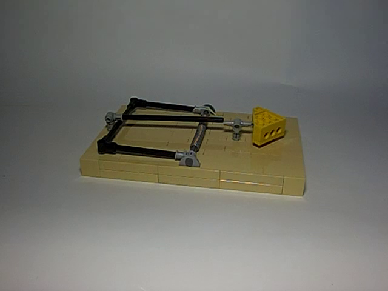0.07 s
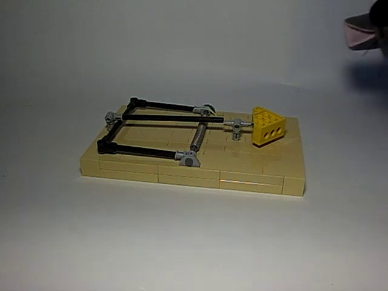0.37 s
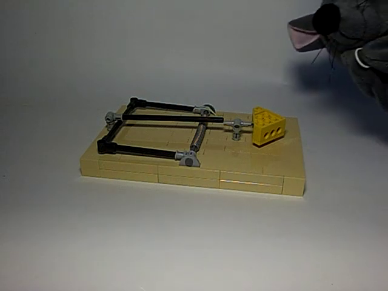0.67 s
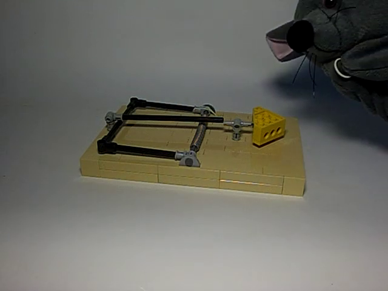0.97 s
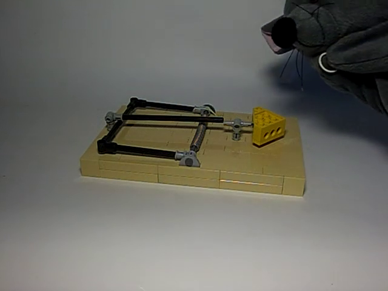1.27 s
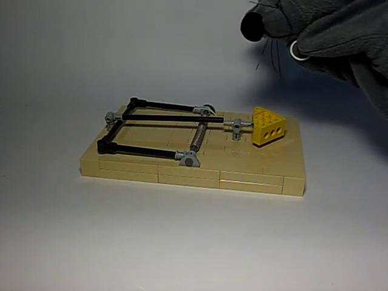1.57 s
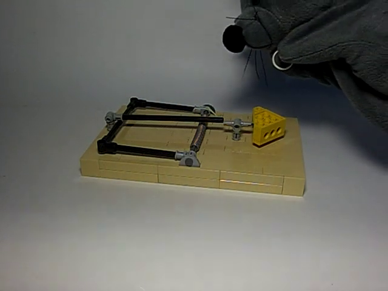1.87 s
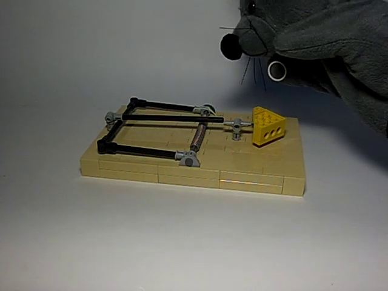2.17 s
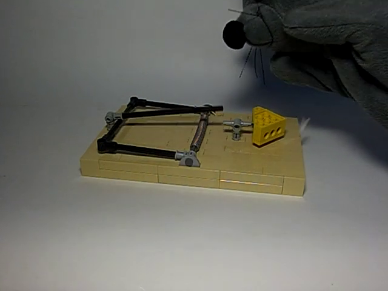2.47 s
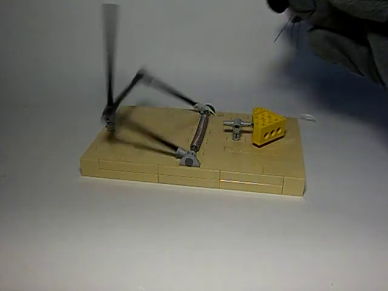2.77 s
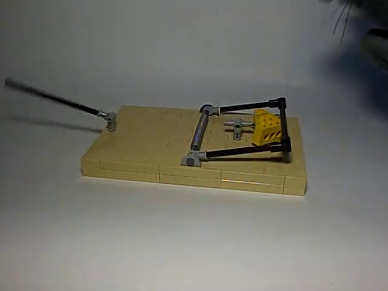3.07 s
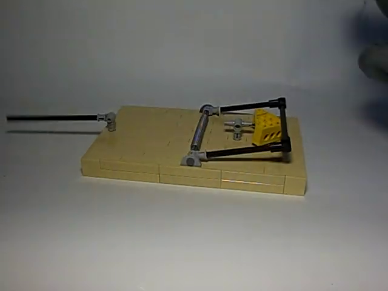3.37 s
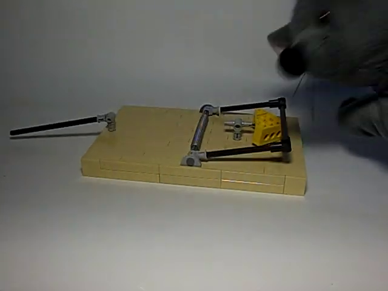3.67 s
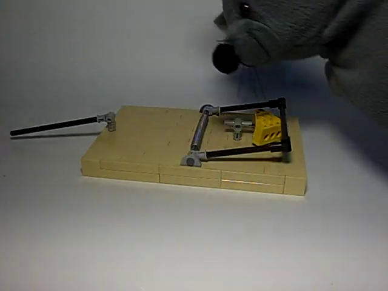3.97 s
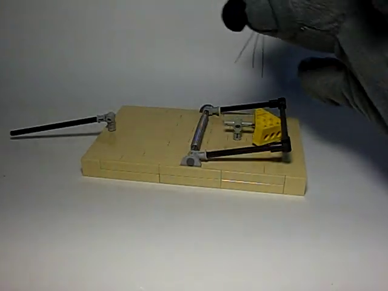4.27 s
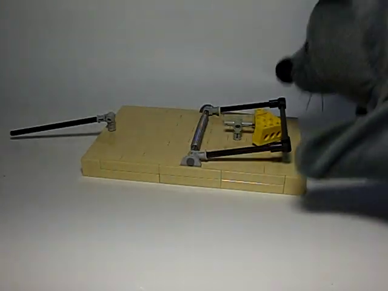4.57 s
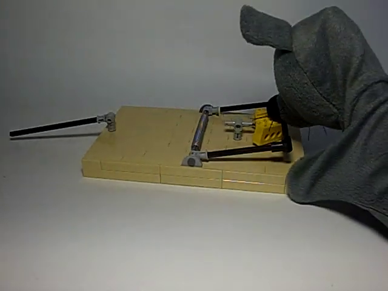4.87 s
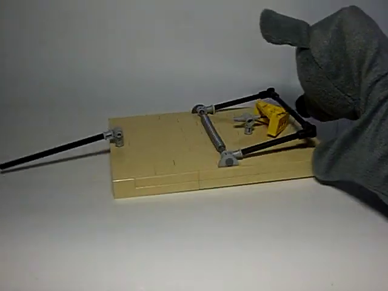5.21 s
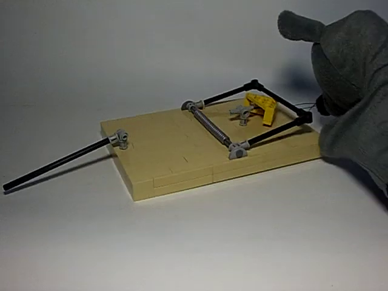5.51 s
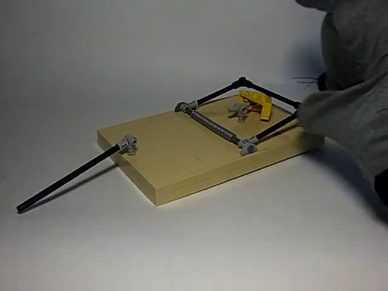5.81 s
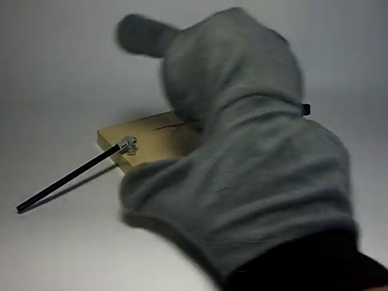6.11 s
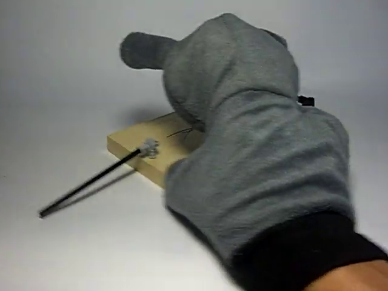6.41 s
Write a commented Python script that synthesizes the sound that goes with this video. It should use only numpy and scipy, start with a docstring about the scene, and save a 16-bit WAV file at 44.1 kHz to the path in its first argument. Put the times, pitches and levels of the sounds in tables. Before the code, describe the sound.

Small plastic clicks lead to one loud mousetrap snap and a light rattle, followed by knocks and short scrapes on a tabletop.

```python
"""A table in a small room, a camera's microphone close to a mousetrap of plastic toy bricks.
A dropped ring trips the catch, the holding bar flies back, the hammer snaps shut and the bar bounces
to rest; each blow makes the loose bricks chatter. A cloth puppet then shoves the trap, and its base
rasps over the table in tiny slips. Behind it all are room air, short wall echoes, faint hum and hiss
and the camera's thin whine. The camera overloads on the snap."""
import sys
import numpy as np
from scipy import signal
from scipy.fft import rfft, irfft
from scipy.io import wavfile

SR = 44100
rng = np.random.default_rng(int(sys.argv[2]) if len(sys.argv) > 2 else 0)


def inscribe(sig):
    """Save sig as 16-bit PCM at rate SR to the path in sys.argv[1].

    A 1-D sig is mono; a 2-D sig holds one channel per row.
    Samples are clipped to [-1, 1] before scaling.
    """
    pcm = np.round(np.clip(np.atleast_2d(sig).T, -1, 1) * 32767)
    wavfile.write(sys.argv[1], SR, pcm.astype(np.int16))


N = 293265
T = np.arange(N) / SR
TOP_HZ = 17000  # upper limit of the camera's sound


def undb(db):
    """Decibels to gain."""
    return 10 ** (np.asarray(db) / 20)


def unit(x):
    """Scale to rms 1."""
    return x / np.sqrt(np.mean(x ** 2))


def at(points, hz):
    """Read (frequency, value) points on a log-frequency axis."""
    freqs, values = np.transpose(points)
    return np.interp(np.log(np.maximum(hz, 1)), np.log(freqs), values)


def band(x, lo_hz, hi_hz, order=3):
    """Causal band-pass."""
    sos = signal.butter(order, [lo_hz, min(hi_hz, SR / 2 - 100)], "band", fs=SR, output="sos")
    return signal.sosfilt(sos, x + 1e-18)


def noise(lo_hz, hi_hz, order):
    """A band of noise at rms 1."""
    return unit(band(rng.standard_normal(N), lo_hz, hi_hz, order))


def through(x, response):
    """Pass a sound through an impulse response."""
    return signal.fftconvolve(x, response)[:N]


def colour(points, size=4096):
    """Minimum-phase impulse response of a (frequency [Hz], level [dB]) spectrum."""
    hz = np.arange(size // 2 + 1) * SR / size
    cepstrum = irfft(np.log(undb(at(points, hz))))
    cepstrum[1:size // 2] *= 2
    cepstrum[size // 2 + 1:] = 0
    return irfft(np.exp(rfft(cepstrum)))


def resonate(x, peaks):
    """Lift a sound by adding a band of it at each resonance."""
    return x + sum(undb(db) * band(x, hz - width / 2, hz + width / 2, order=1) for hz, width, db in peaks)


def decay(t, t60):
    """Fall by 60 dB every t60 seconds."""
    return np.exp(-np.log(1000) * t / t60)


def envelope(start, length, attack_s, release_s):
    """Rise in a straight line, hold, then die away with the release time constant."""
    return np.clip((T - start) / attack_s, 0, 1) * np.exp(-np.maximum(T - start - length, 0) / release_s)


# the empty room at the microphone: (frequency [Hz], relative level [dB])
AIR_SPECTRUM = [(15, -38), (25, 7.5), (39, -17), (85, -15.5), (241, -2), (274, -3), (492, -4), (862, -6.5),
                (979, -7), (1400, -8), (5670, -19), (7130, -22), (8310, -23), (11000, -24.5), (14300, -50),
                (22000, -120)]
# bands of steady background noise: low hum, high hiss and a narrow hiss around the whine:
# (centre [Hz], width [Hz], level [dB])
NOISE_BANDS = [(129.3, 28, -72), (245, 20.5, -64), (12300, 450, -64.5), (14000, 4300, -67),
               (14620, 220, -76)]

def background(air_db=-51.5):
    """Steady room air with a low hum and a high hiss."""
    air = undb(air_db) * unit(through(rng.standard_normal(N), colour(AIR_SPECTRUM)))
    bands = sum(undb(db) * noise(hz - width / 2, hz + width / 2, order=1) for hz, width, db in NOISE_BANDS)
    return air + bands


def whine(upper_hz=14462, upper_db=-57, lower_hz=8183, lower_db=-73, frame_hz=29.97):
    """Two thin electronic tones inside the camera; the upper one restarts with every picture frame."""
    upper = undb(upper_db) * np.sin(2 * np.pi * upper_hz * (T % (1 / frame_hz)))
    lower = undb(lower_db) * np.sin(2 * np.pi * lower_hz * T)
    return np.sqrt(2) * (upper + lower)


# notches of the microphone port: (centre [Hz], width [Hz])
PORT_NOTCHES = [(7230, 270), (7870, 380)]
# its resonance: (centre [Hz], width [Hz], added level [dB])
PORT_RESONANCE = [(8043, 202, -0.5)]

def mic_port(x):
    """The microphone opening cancels two narrow treble bands and rings just above them."""
    for hz, width in PORT_NOTCHES:
        x = signal.lfilter(*signal.iirnotch(hz, hz / width, fs=SR), x)
    return resonate(x, PORT_RESONANCE)


# decay of the small room: (frequency [Hz], t60 [s])
ECHO_DECAY = [(200, 0.24), (1000, 0.48), (3500, 0.66), (6000, 0.78), (10000, 0.5), (13000, 0.4),
              (16000, 0.3)]
# its echoes against the direct sound: (frequency [Hz], relative level [dB])
ECHO_SPECTRUM = [(200, -6.5), (1000, -12), (3000, -12), (5500, -10), (9500, -15.5), (11500, -14.5),
                 (13500, -13.5)]

def room(x, build_s=0.0034, wet_db=0.16):
    """Diffuse echoes off the near walls build up quickly and linger longest around 6 kHz."""
    t, tail = T[:SR], 0
    edges = np.linspace(np.sqrt(100), np.sqrt(TOP_HZ), 41) ** 2
    for lo, hi in zip(edges, edges[1:]):
        hz = np.sqrt(lo * hi)
        shape = (1 - np.exp(-(t / build_s) ** 2)) * decay(t, at(ECHO_DECAY, hz))
        echoes = band(rng.standard_normal(SR), lo, hi)
        tail = tail + undb(at(ECHO_SPECTRUM, hz)) * echoes * shape / np.linalg.norm(shape)
    return undb(wet_db) * through(x, tail)


def soft_tone(start_s=2.408, length_s=0.14, end_db=-39, swell_db_per_s=68,
              held_hz=339, bend_at_s=2.502, bend_hz_per_s=820):
    """A faint tone just before the catch trips: it swells at one pitch, then bends up and fades."""
    elapsed = np.clip(T - start_s, 0, length_s)
    swell = undb(end_db - swell_db_per_s * (length_s - elapsed))
    gain = swell * envelope(start_s, length_s, attack_s=0.015, release_s=0.0085)
    hz = held_hz + bend_hz_per_s * np.maximum(T - bend_at_s, 0)
    return np.sqrt(2) * gain * np.sin(2 * np.pi * np.cumsum(hz) / SR)


# cloth and turning pivots: (time [s], half length [s], level [dB], low edge [Hz], high edge [Hz])
BRIEF_RUBS = [(0.823, 0.095, -57, 2500, 11000), (2.769, 0.0064, -33, 1400, 2950),
              (2.887, 0.0097, -36, 1190, 3470), (6.579, 0.0375, -39, 5450, 6400)]

def rubs():
    """Smooth surfaces brush past each other: short swells of friction noise."""
    return sum(undb(db) * np.exp(-((T - s) / half_length) ** 2) * noise(lo, hi, order=2)
               for s, half_length, db, lo, hi in BRIEF_RUBS)


def chatter(hits, tick_life=0.52, knock_life=1.87, knock_lag_s=0.00035):
    """Hits rattle the loose bricks: knock, clack and tick forces. Each life multiplies the hit's t60."""
    forces, t = np.zeros((3, N)), T[:SR // 10]
    for s, clack_db, knock_db, tick_db, rise_s, t60 in hits:
        start = int(s * SR)
        rattle = rng.choice([-1., 1.], (3, len(t)))
        # the heavy base answers late and long, the hard edges at once and briefly
        parts = [(knock_db, knock_life, knock_lag_s), (clack_db, 1, 0), (tick_db, tick_life, 0)]
        for k, (db, life, lag_s) in enumerate(parts):
            peak_s = max(rise_s + lag_s, 1 / SR)
            shape = np.minimum(t / peak_s, 1) * decay(np.maximum(t - peak_s, 0), t60 * life)
            forces[k, start:start + len(t)] += (undb(db) * shape * rattle[k])[:N - start]
    return forces


def plastic(forces, spectrum, base_hz=1150, edge_hz=7000):
    """The base knocks, the bricks clack and their edges tick, in the colour of the driven part."""
    body, sound = colour(spectrum), 0
    for force, (lo, hi) in zip(forces, [(35, base_hz), (base_hz, edge_hz), (edge_hz, TOP_HZ)]):
        response = band(body, lo, hi)
        sound = sound + through(force, response / np.linalg.norm(response))
    return sound


def thud(s=5.576, db=-43, rise_s=0.0054, t60=.26):
    """The tilted base drops back flat and the tabletop booms briefly."""
    boom = noise(lo_hz=95, hi_hz=260, order=2)
    return undb(db) * boom * envelope(s, rise_s, rise_s, t60 / np.log(1000))


# the puppet's nose meets the base: (time [s], level [dB])
NOSE_BUMPS = [(4.854, -36.5), (4.8815, -34.5), (4.8875, -41)]
# the bricks under a soft bump: (frequency [Hz], relative level [dB])
BUMP_SPECTRUM = [(100, -25), (300, -17), (460, 4), (750, -3), (1050, -5.5), (1600, -7.5), (4000, -18),
                 (12000, -24)]

def nose_bumps(clack_db=-19, tick_db=-26, rise_s=0.00047, t60=0.0148):
    """The padded nose gives nearly all knock."""
    hits = [(s, db + clack_db, db, db + tick_db, rise_s, t60) for s, db in NOSE_BUMPS]
    return plastic(chatter(hits), BUMP_SPECTRUM)


def friction(slips_per_s, spread_db, fibre_db, judder_db=0.05, judder_hz=110):
    """Dense little slips of uneven size over the smooth rub of cloth, with a trace of judder."""
    sizes = undb(spread_db * np.minimum(rng.exponential(size=N), 4))
    slipping = rng.random(N) < slips_per_s / SR
    slips = unit(slipping * sizes * rng.choice([-1, 1], N))
    judder = noise(25, judder_hz, order=2)
    fibres = undb(fibre_db) * rng.standard_normal(N)
    return unit(slips + fibres) * undb(judder_db * judder)


# the trap slides: (time [s], length [s], rasp level [dB], weight on the table re rasp [dB])
TRAP_SHOVES = [(4.945, 0.043, -52.5, 6), (4.986, 0.0701, -41.5, -9), (5.062, 0.073, -46.5, -3.5),
               (5.132, 0.085, -35, -9), (5.237, 0.125, -50.5, -1), (5.424, 0.0562, -42.5, -6.5),
               (5.574, 0.071, -38, -5), (6.342, 0.061, -40, -2.5), (6.405, .11, -40, -14.5),
               (6.515, .125, -35, -13)]
# the puppet's cloth brushes it: (time [s], length [s], level [dB])
CLOTH_STROKES = [(4.49, .11, -50.5), (4.62, .07, -50.5), (4.788, 0.029, -44), (4.875, 0.073, -57),
                 (5.355, 0.084, -53), (5.496, 0.096, -50.5), (6.079, 0.207, -49), (6.29, 0.11, -49)]
# the sliding contact: (frequency [Hz], relative level [dB])
SCRAPE_SPECTRUM = [(100, -50), (400, -8.5), (800, 0.5), (1400, -1), (2300, 2), (3400, 1), (4800, -2.5),
                   (6300, -11.5), (9000, -13.5), (11500, -11.5), (13500, -18), (16500, -27)]
# resonances of the sliding base: (centre [Hz], width [Hz], added level [dB])
BASE_RESONANCES = [(674, 50, -10), (910, 34, -7.5), (2396, 38, -6), (3390, 270, -7.5)]

def sliding(shove_grit_db=-8, stroke_weight_db=-16, stroke_grit_db=-6.5):
    """Shoves grind the base on the table, strokes only brush it; weight sets the bass, grit the treble."""
    shoves = strokes = 0
    for s, length, db, weight_db in TRAP_SHOVES:
        gains = undb([db + weight_db, db, db + shove_grit_db])
        shoves += np.outer(gains, envelope(s, length, attack_s=0.0172, release_s=0.018))
    for s, length, db in CLOTH_STROKES:
        gains = undb([db + stroke_weight_db, db, db + stroke_grit_db])
        strokes += np.outer(gains, envelope(s, length, attack_s=0.021, release_s=0.043))
    grind = shoves * friction(slips_per_s=1800, spread_db=2, fibre_db=-2.5)
    brush = strokes * friction(slips_per_s=4000, spread_db=3, fibre_db=4)
    return resonate(plastic(grind + brush, SCRAPE_SPECTRUM), BASE_RESONANCES)


def hinge_squeak(s=3.2715, width_s=0.005, db=-42, from_hz=9500, to_hz=10700, roughness=0.039):
    """The pin of the swinging bar sticks and slips in one tiny rising squeak."""
    progress = (T - s) / width_s
    jitter = 1 + roughness * noise(100, 1500, order=1)
    hz = np.interp(progress, [-1, 1], [from_hz, to_hz]) * jitter
    return undb(db) * np.sqrt(2) * np.exp(-progress ** 2) * np.sin(2 * np.pi * np.cumsum(hz) / SR)


def bounces(s=3.1655, landing_db=-34, count=6, first_hop_s=.1595, restitution=.756, hop_loss_db=2,
            knock_db=-5.5, tick_db=-9, rise_s=0.00037, t60=0.04):
    """The bar hops on the table; each hop keeps a share of the speed and so of the flight time."""
    hits = []
    for hop in range(count):
        db = landing_db - hop_loss_db * hop
        hits.append((s, db, db + knock_db, db + tick_db, rise_s, t60))
        s += first_hop_s * restitution ** hop
    return hits


# jolts of the loose bar: (time [s], level [dB])
BAR_JOLTS = [(3.169, -43), (3.319, -41), (3.423, -45.5), (4.996, -35.5), (5.068, -36), (5.1343, -29.5)]

def jolts(knock_db=-17, tick_db=-6, rise_s=0.00087, t60=0.037):
    """The bar clicks in the play of its hinge."""
    return [(s, db, db + knock_db, db + tick_db, rise_s, t60) for s, db in BAR_JOLTS]


# the holding bar from close by: (frequency [Hz], relative level [dB])
BAR_SPECTRUM = [(150, -14), (380, 5.5), (650, -6.5), (1200, -0.5), (2000, 1), (3300, 7), (4300, 1),
                (5200, 4.5), (6200, -1), (7200, -3), (9000, -1), (14000, -15)]

def holding_bar():
    """The freed bar clatters on the table and clicks and squeaks in its hinge."""
    forces = chatter(bounces() + jolts(), knock_life=2.3, knock_lag_s=0.00094)
    return plastic(forces, BAR_SPECTRUM) + hinge_squeak()


# light touches of brick edges: (time [s], level [dB])
EDGE_TICKS = [(2.397, -47.5), (3.259, -44), (4.7902, -29.5), (5.523, -43.5), (5.585, -39)]

def edge_ticks(clack_db=-16, knock_db=-20, rise_s=0.00035, t60=0.0403):
    """Brick edges touch with hardly any body."""
    return [(s, db + clack_db, db + knock_db, db, rise_s, t60) for s, db in EDGE_TICKS]


# catch, bar, hammer and base strike: (time [s], level [dB], hardness [0-1], rattle t60 [s])
TRAP_BLOWS = [(2.514, -45.5, 0.2, 0.039), (2.628, -33, .98, 0.018), (2.644, -41, 0.8, 0.031),
              (2.7313, -45.5, 0, 0.0177), (2.754, -46, 0, .05), (2.7655, -34, 0.1, 0.047),
              (2.7775, -17, 0.84, 0.047), (2.797, -30.5, 0.1, 0.019), (2.803, -32.5, 0.2, 0.025),
              (2.8937, -3, 1, 0.028), (2.920, -16, 0.9, 0.019), (2.931, -24.5, 0.4, .035),
              (2.962, -20.5, .55, 0.014), (3.96, -45, 0.26, .03), (4.779, -43, 0.1, 0.054),
              (4.9769, -35.5, 0.26, 0.018), (5.219, -29.5, 0.97, .015), (5.444, -38, 0.06, 0.025),
              (5.566, -22, 0.6, 0.068), (5.574, -17.5, 0.22, 0.024), (5.681, -30, 0.78, 0.051),
              (5.6858, -25.5, 0.81, 0.0423), (6.381, -30, 0.43, 0.046), (6.389, -27.5, 0.6, .026),
              (6.544, -32, 0.26, .013), (6.602, -29, 0.79, .024)]

def blows(soft_knock_db=.5, hard_knock_db=-14.5, soft_tick_db=-30, hard_tick_db=2.5, rise_share=0.029):
    """A harder blow starts faster, ticks more and knocks less."""
    hits = []
    for s, db, hardness, t60 in TRAP_BLOWS:
        knock_db = db + np.interp(hardness, [0, 1], [soft_knock_db, hard_knock_db])
        tick_db = db + np.interp(hardness, [0, 1], [soft_tick_db, hard_tick_db])
        rise_s = rise_share * t60 * (1 - hardness ** 3)
        hits.append((s, db, knock_db, tick_db, rise_s, t60))
    return hits


# modes of base, hammer and spring: (frequency [Hz], relative level [dB], t60 [s])
TRAP_MODES = [(254.4, 6, 0.4), (339, 0, 0.277), (696, -1, 0.053), (810, -1, 0.37), (1274, -13, 0.35),
              (1360, 9, 0.36), (1887, 5.5, 0.24), (2450, -15, 0.18), (2660, -14, 0.34), (2960, -11, .25),
              (3005, -6.5, 0.74), (3850, 1, 0.27), (5120, 7, .15), (5100, -2, 0.15), (11850, -5, .16)]

def ringing(ring_db=-35):
    """Each of the trap's blows leaves the base, hammer and spring ringing faintly."""
    kicks, t = np.zeros(N), T[:SR]
    for s, db, *_ in TRAP_BLOWS:
        kicks[int(s * SR)] = undb(db)
    ring = sum(undb(db) * decay(t, t60) * np.sin(2 * np.pi * hz * t) for hz, db, t60 in TRAP_MODES)
    return undb(ring_db) * through(kicks, ring)


# the brick body from close by: (frequency [Hz], relative level [dB])
BODY_SPECTRUM = [(70, -16.5), (140, -26.5), (250, -5.5), (420, -8.5), (720, 1.5), (1000, 1.5), (1500, -1.5),
                 (2200, 4), (3200, 3), (4800, -1), (6500, -6.5), (9500, 1.5), (12000, 5.5), (13500, 0),
                 (16000, -12.5)]

def trap():
    """The hammer's snap and the lesser blows and ticks sound through the brick body."""
    return plastic(chatter(blows() + edge_ticks()), BODY_SPECTRUM)


def scene():
    """Trap and puppet close to one microphone, the small room behind them."""
    close = trap() + holding_bar() + nose_bumps() + sliding() + rubs()
    at_mic = mic_port(close + room(close) + ringing() + background())
    return (at_mic + thud() + soft_tone() + whine())[None]


def record(dry):
    """The camera's sound starts a moment late, overloads at full scale and loses the top."""
    start_s = .135
    sound = np.clip(dry, -1, 1) * (T > start_s)
    return signal.sosfilt(signal.ellip(8, .2, 80, TOP_HZ, fs=SR, output="sos"), sound)


dry = scene()
out = record(dry)
inscribe(out)
```